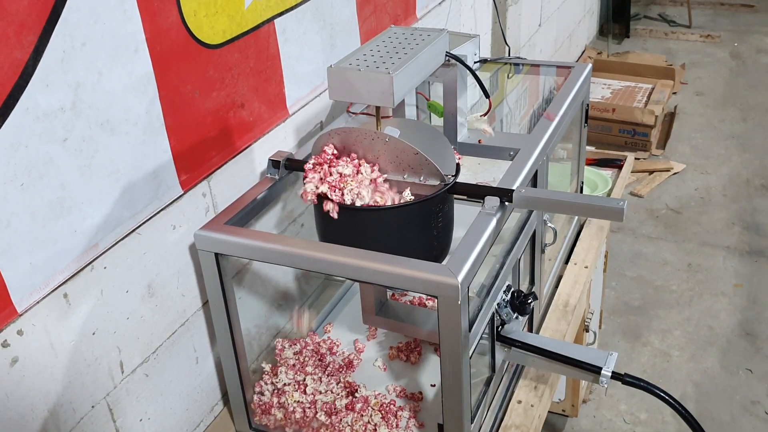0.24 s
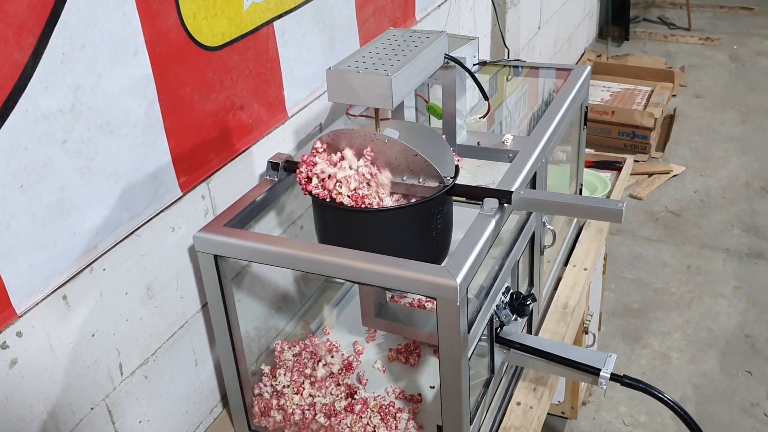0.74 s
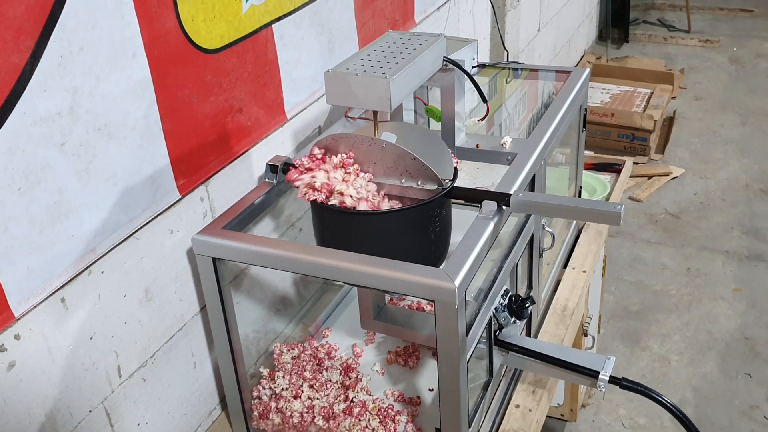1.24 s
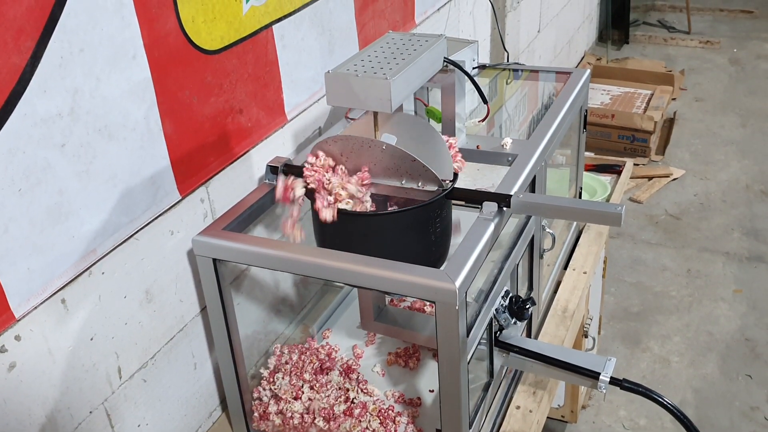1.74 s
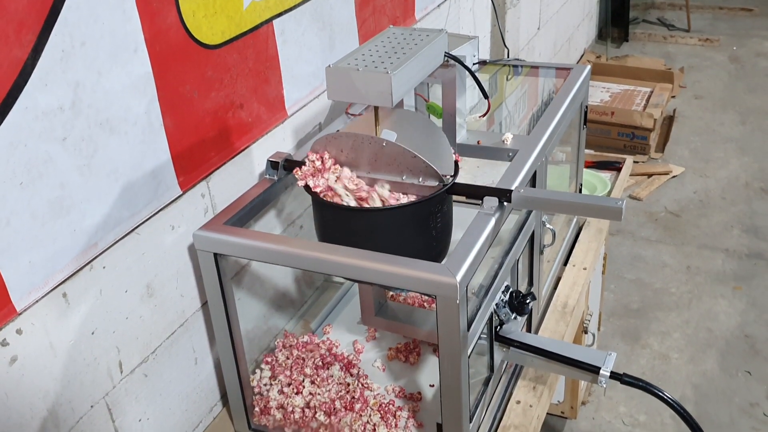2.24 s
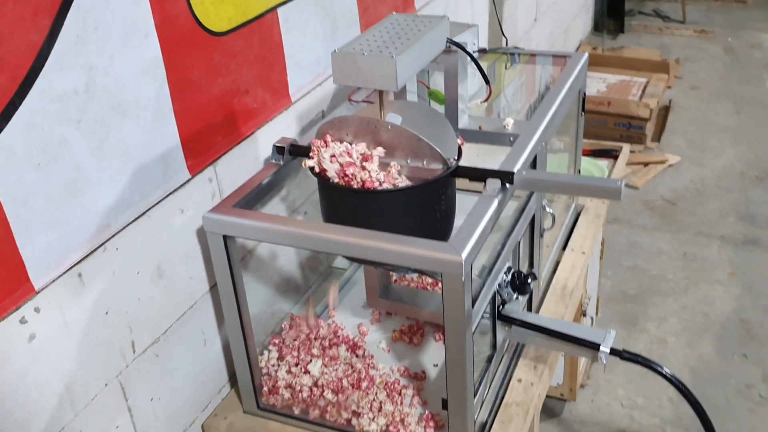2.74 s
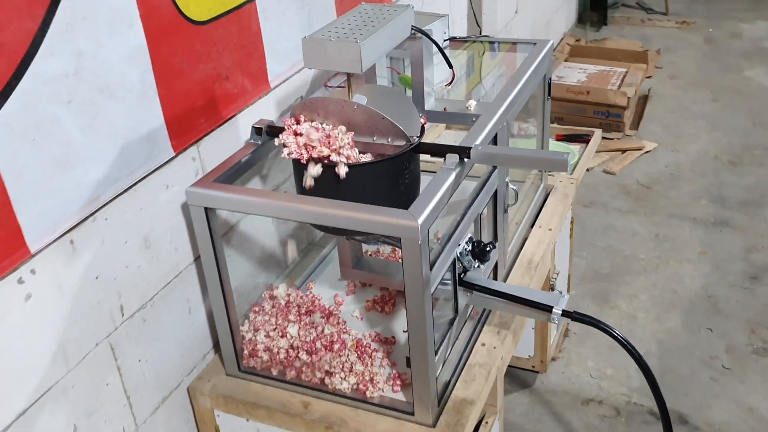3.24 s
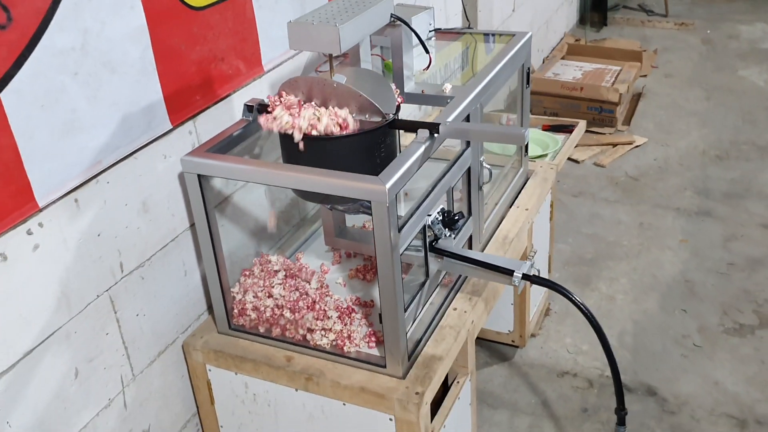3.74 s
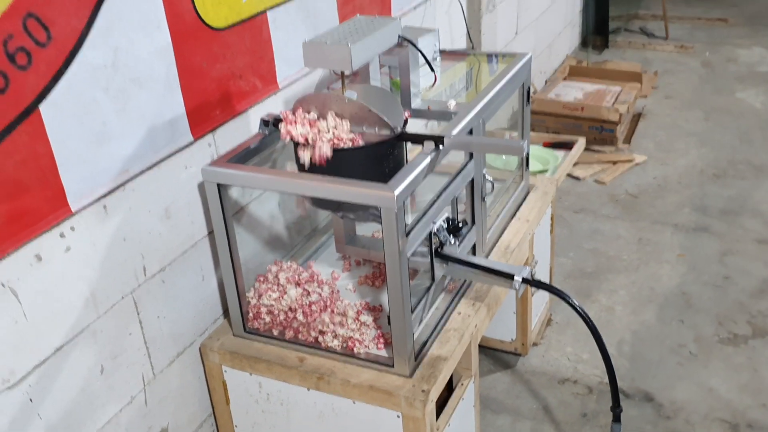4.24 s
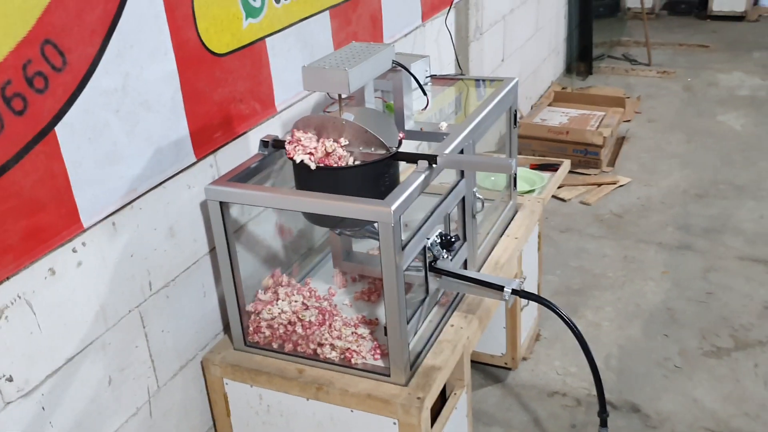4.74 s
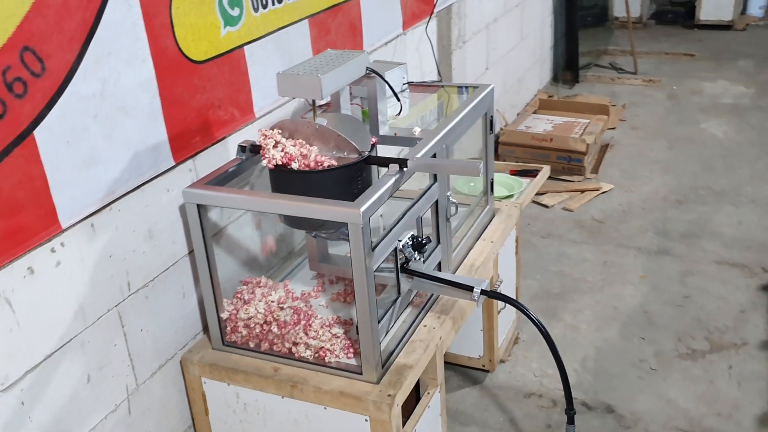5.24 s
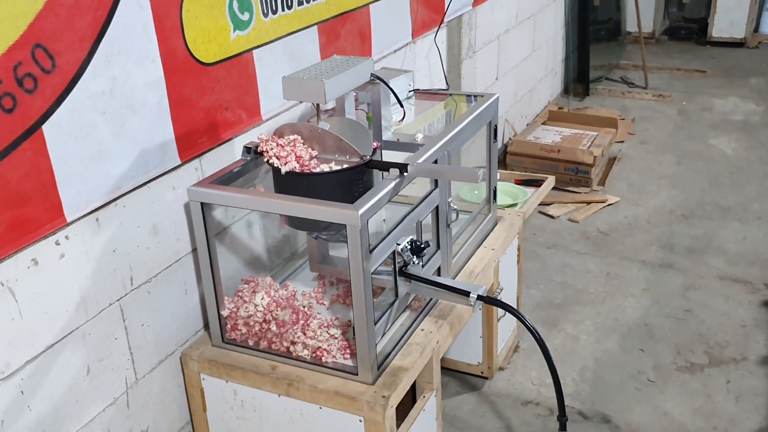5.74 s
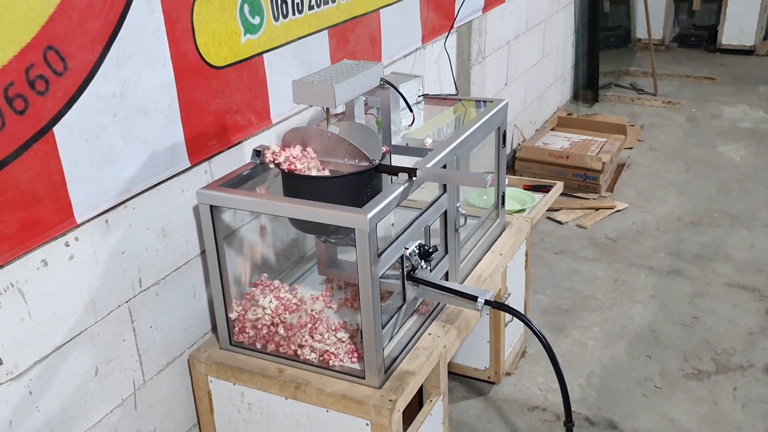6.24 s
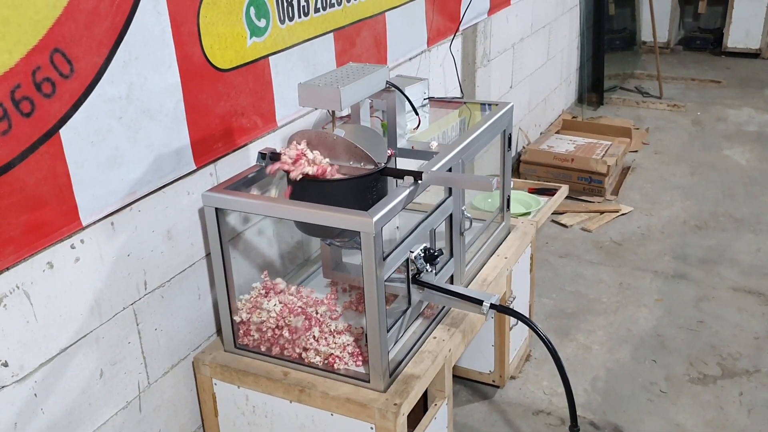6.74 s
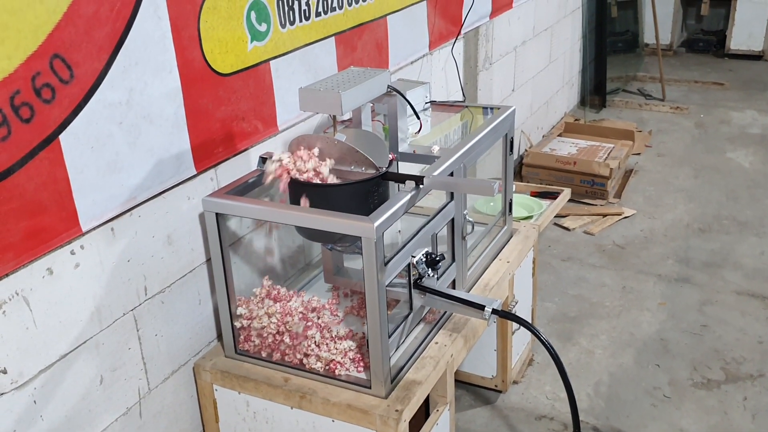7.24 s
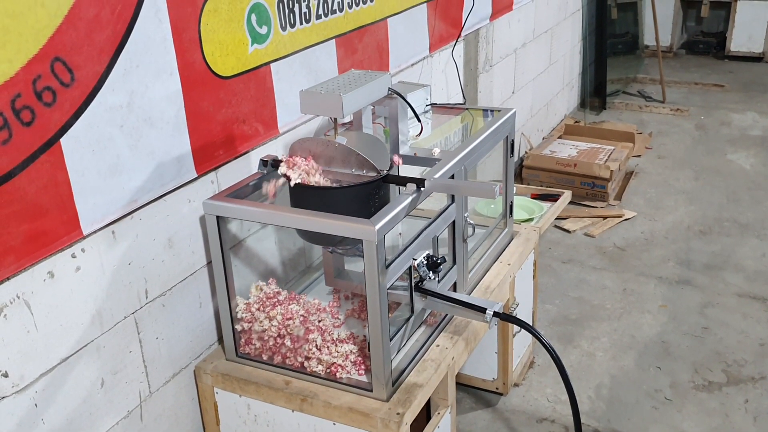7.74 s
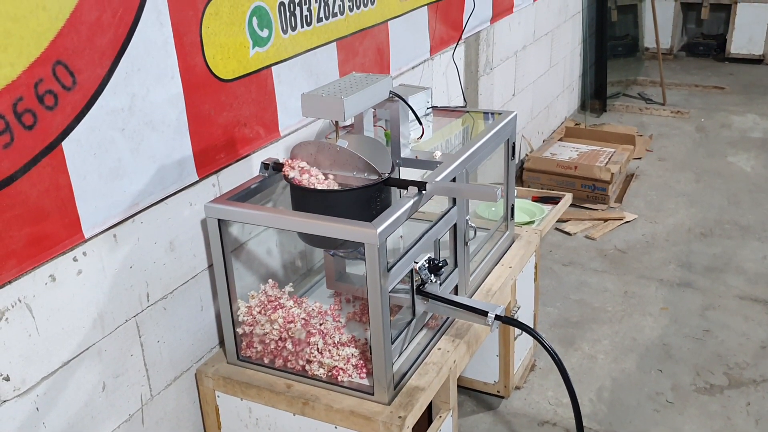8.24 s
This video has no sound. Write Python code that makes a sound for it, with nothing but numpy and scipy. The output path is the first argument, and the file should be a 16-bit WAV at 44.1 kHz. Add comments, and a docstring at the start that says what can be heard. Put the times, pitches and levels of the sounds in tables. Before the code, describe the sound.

Dense uneven popping with hollow pot knocks and crisp steam snaps, a faint stirrer whine and sizzle beneath, echoing briefly in a hard room.

```python
"""Bare hall: kernels burst one after another in a steel kettle half full of popped corn, a couple of metres away.
Each burst knocks the air and wall of the kettle into a short hollow ring (decaying sines), followed by a
softer rebound, and lets out a crack of steam (resonant noise). The stirrer motor hums and whines and the hot
oil hisses (filtered noise); decaying noise echoes give the hall, and a limiter ducks under loud bursts."""
import sys
import numpy as np
from scipy import signal
from scipy.io import wavfile

SR = 44100
rng = np.random.default_rng(int(sys.argv[2]) if len(sys.argv) > 2 else 0)


def persist_wave(psi):
    """Save psi, clipped to +-1, as 16-bit WAV."""
    counts = np.round(np.clip(psi, -1, 1) * 32767).astype(np.int16)
    wavfile.write(sys.argv[1], SR, np.atleast_2d(counts).T)


N = 374405


def from_db(db):
    """Amplitude gain of a level in dB."""
    return 10 ** (np.asarray(db) / 20)


def rms_one(x):
    """Scaled to rms 1."""
    return x / np.sqrt(np.mean(x ** 2) + 1e-20)


def butter2(kind, edges_hz, x):
    """Second-order Butterworth design applied to x."""
    return signal.sosfilt(signal.butter(2, edges_hz, kind, fs=SR, output="sos"), x)


def drift(rate_hz):
    """Slow random wander of rms 1: two-pole low-passed noise, computed at SR / 40 and interpolated."""
    step, settle = 40, 2000
    pole = np.exp(-2 * np.pi * rate_hz * step / SR)
    noise = rng.standard_normal(N // step + settle + 2)
    slow = signal.lfilter([1], [1, -2 * pole, pole * pole], noise)[settle:]
    return np.interp(np.arange(N) / step, np.arange(len(slow)), rms_one(slow))


def resonance(x, hz, width_hz):
    """Two-pole band-pass with gain near 1 on top."""
    r = np.exp(-np.pi * width_hz / SR)
    zeros = np.array([1, 0, -1]) * (1 - r * r) / 2
    poles = [1, -2 * r * np.cos(2 * np.pi * hz / SR), r * r]
    return signal.lfilter(zeros, poles, x)


def clicks_at(start_s, gains):
    """Click train: one sample per start time."""
    out = np.zeros(N)
    np.add.at(out, np.clip((start_s * SR).astype(int), 0, N - 1), gains)
    return out


def fading(clicks, t60_s):
    """Each click starts an exponential fade."""
    decay = from_db(-60 / (t60_s * SR))
    return signal.lfilter([1], [1, -decay], clicks + 1e-18)   # offset avoids denormals


def hiss(level_db, patchy_db):
    """Hiss and rumble of motor, burner and oil: third-octave noise bands, each with its own quick flicker."""
    # noise spectrum, relative: f/Hz, density/dB
    spectrum = [(20, -44), (55, -31), (100, -38), (250, -49), (500, -1.5), (1000, 1.5), (2000, -9.5),
                (2800, -9.5), (3700, -9), (5500, -15.5), (7200, -16.5), (8300, -9), (10000, -45),
                (16000, -60)]
    hz_of, db_of = np.transpose(spectrum)
    edges_hz = 20 * 2 ** np.arange(0, 9.9, 1 / 3)
    white = rng.standard_normal((2, N))   # alternate bands share a source
    out = 0
    for k, (low_hz, high_hz) in enumerate(zip(edges_hz, edges_hz[1:])):
        band = butter2("band", [low_hz, high_hz], white[k % 2])
        db = np.interp(np.log(low_hz * high_hz) / 2, np.log(hz_of), db_of)
        out = out + from_db(db + patchy_db * drift(40)) * band
    return from_db(level_db) * rms_one(out)


def motor():
    """Housing and gears sing as narrow bands of noise, slowly wavering in level."""
    # motor resonances: f/Hz, width of each of two passes/Hz, rms before wavering/dB
    modes = [(66.4, 81, -39.5), (148.4, 11.6, -37.5), (2320, 210, -42.5), (2482, 55, -44.5)]
    out = 0
    for hz, width_hz, rms_db in modes:
        once = resonance(rng.standard_normal(N), hz, width_hz)
        band = rms_one(resonance(once, hz, width_hz))
        out = out + from_db(rms_db + 0.5 * drift(1.4)) * band
    return out


def hall(x, count=9):
    """Dense reflections build up in a few ms and die band by band; they change as the listener moves."""
    # reverberation: band top/Hz, t60/s, level/dB
    bands = [(723, 0.36, -2), (2700, 0.27, 0), (8000, 0.38, -2)]
    build_s = 0.0081
    t = np.arange(SR // 2) / SR
    white = rng.standard_normal((count, len(t)))
    answers, low_hz = 0, 100
    for top_hz, t60_s, db in bands:
        band = butter2("band", [low_hz, top_hz], white)
        tail_norm = np.sqrt(t60_s * SR / (2 * np.log(1000)))   # equalises tail energy across t60
        answers = answers + band * from_db(db - 60 * t / t60_s) / tail_norm
        low_hz = top_hz
    answers = answers * (1 - np.exp(-t / build_s))
    # crossfade through the responses at an even pace
    place = np.linspace(0, count - 1, N)
    near = np.maximum(1 - np.abs(place - np.arange(count)[:, None]), 0)
    return signal.oaconvolve(x * near, answers, axes=1)[:, :N].sum(axis=0)


def cracks(start_s, crack_db):
    """A puff of steam, its slap off the near wall and a grainy rattle of corn, as noise in resonances."""
    # colour of the crack: f/Hz, width of first pass/Hz, level/dB
    colour = [(1930, 834, 5), (3180, 550, 3), (3890, 774, 4), (6015, 910, -10.5), (7017, 660, -3),
              (8700, 454, -6), (12100, 4800, -22.5)]
    wall_echo_s, wall_echo_db = 0.0057, -11
    rattle_db, scatter_db = -10.5, 3.5
    luck = rng.standard_normal((len(start_s), len(colour)))
    # grains: noise whose level jumps every 64 samples
    grain_db = 3.17 * np.repeat(rng.standard_normal(N // 64 + 1), 64)[:N]
    grains = rng.standard_normal(N) * from_db(grain_db)
    out = 0
    for k, (hz, width_hz, db) in enumerate(colour):
        gains = from_db(crack_db + db + scatter_db * luck[:, k])
        direct = clicks_at(start_s, gains)
        clicks = direct + clicks_at(start_s + wall_echo_s, gains * from_db(wall_echo_db))
        puff = fading(clicks, 0.024) - .5 * fading(clicks, 0.007)
        shape = puff + from_db(rattle_db) * fading(clicks, 0.2)
        band = resonance(resonance(shape * grains, hz, width_hz), hz, 2 * width_hz)
        out = out + band * (-1) ** k
    return out


def hollow_pitch(start_s):
    """Favoured pitch of each hollow ring in Hz, lower once the listener has stepped back."""
    # centre pitch: t/s, f/Hz
    course = [(0, 490), (0.5, 530), (3.0, 543), (4.0, 474), (5.3, 454), (8.49, 497)]
    spread = 0.055   # relative, per burst
    stray = 1 + spread * rng.standard_normal(len(start_s))
    return np.interp(start_s, *np.transpose(course)) * stray


def kettle(start_s, hollow_db, upper_db, centre_hz, scatter_db, detune):
    """Each burst sits elsewhere in the shifting corn: it drives, detunes and damps every mode anew."""
    # kettle modes: f/Hz, relative level/dB, nominal t60/s
    modes = [(231, 1.5, 0.078), (258, -1, 0.033), (276, -1, 0.088), (379, -4, 0.028), (430.6, -0.5, 0.083),
             (476.7, -3, 0.065), (519.4, -1.5, 0.043), (568.7, -1, 0.085), (619, -3.5, 0.081),
             (697.3, -4.5, 0.13), (894, 11.5, 0.051), (1040, 12.5, 0.03), (1111, 20.5, 0.022),
             (1193, 15.5, 0.036), (1224, -14, 0.12), (1428, 1, 0.13), (1460, -0.5, 0.048), (1674, 5, 0.049),
             (1776, -1, 0.052), (2140, -9, 0.034)]
    hz, level_db, t60_s = np.transpose(modes)
    upper_from_hz, deep_to_hz = 760, 340
    deep_loss_db_per_s = 0.7
    rebound_min_s, rebound_max_s, rebound_db = 0.004044, .011, -9.5
    upper, deep = hz > upper_from_hz, hz < deep_to_hz
    build_s = np.where(upper | deep, 0.61 / hz, .003)   # kettle air takes a few ms to swing up
    luck = rng.standard_normal((len(start_s), 4, len(modes)))
    t = np.arange(SR // 8)[:, None] / SR
    knock = 1 + upper * 1.4 * np.exp(-t / .0028)   # hard head of the wall's answer
    rebound = (SR * rng.uniform(rebound_min_s, rebound_max_s, len(start_s))).astype(int)
    out = np.zeros(N + 2 * len(t))
    for k, (drive, shift, damp, late) in enumerate(luck):
        # hollow modes near the centre are favoured
        away_octaves = np.clip(np.abs(np.log2(hz / centre_hz[k])), 0, .45)
        db = level_db + scatter_db * drive - np.where(upper, 0, 22 * away_octaves)
        # deepest modes thin out within the hollow ring as the listener steps back
        db = db - deep_loss_db_per_s * start_s[k] * deep
        since_s = np.maximum(t - 0.33 * np.abs(late) / hz, 0)
        burst_t60_s = t60_s * from_db(0.66 * damp)
        fade = (1 - np.exp(-since_s / build_s)) * from_db(db - 60 * since_s / burst_t60_s)
        swing = np.sin(2 * np.pi * hz * (1 + detune * shift) * since_s)
        rings = -knock * fade * swing
        at = int(start_s[k] * SR)
        again = at + rebound[k]   # the kernel strikes the wall again
        for group, peak_db in ((~upper, hollow_db[k]), (upper, upper_db[k])):
            ring = rings[:, group].sum(axis=1)
            ring = from_db(peak_db) * ring / np.abs(ring).max()
            out[at:at + len(t)] += ring
            out[again:again + len(t)] -= from_db(rebound_db) * ring
    # a small body radiates no steady push
    return butter2("high", 140, out[:N])


def popping():
    """The clear bursts, and many faint ones smothered deep in the heap at random times."""
    # bursts: t/s, hollow ring peak before filtering/dB, upper ring peak before filtering/dB, crack level/dB
    pops = [(0.004, -10, -7.5, -18.0), (0.032, -1, -5, -17.5), (0.063, -11, -13, -21),
            (0.147, -10.5, -6.5, -21), (0.167, -9.5, -25, -13), (0.267, -5, -12.5, -25.0),
            (0.286, -30, -16, -15.5), (0.313, -12.5, -1.5, -25), (0.337, -9.5, -3.5, -26),
            (0.367, -12, -15, -20.5), (0.39, -12.5, -15, -34), (0.44, -6, 1, -10), (0.469, -4, -0.5, -26),
            (0.509, -3, -2, -13), (0.52, -17, -10, -21), (0.531, -5.5, 0, -19), (0.595, -9.5, -4.5, -16),
            (0.616, -6.5, -4, -26), (0.632, 1.5, 2.5, -14), (0.683, -15, -10.5, -21.5),
            (0.726, -6.5, -9.5, -18), (0.808, -6.5, -3.5, -23.5), (0.835, -7.5, -7.5, -22),
            (0.921, -7.5, -9, -25.5), (0.931, -11, -11, -21), (0.97, -8.0, -5, -19.5),
            (1.001, -6, -9.0, -20), (1.024, -3.0, -8.5, -13.5), (1.119, -5, -8, -14.5),
            (1.135, -32, -13, -29), (1.164, -8.0, -3.5, -32), (1.196, -7.0, -7.0, -15.5),
            (1.229, -8.5, -14, -32), (1.239, -15, -7, -17), (1.281, -7.5, -10, -27), (1.32, -5.5, -10, -31),
            (1.328, -9, -16, -15), (1.457, -14, -11.5, -19.5), (1.508, -16.5, -10.5, -19.5),
            (1.529, -11, -7.0, -26), (1.614, -13.0, -16.5, -24.5), (1.733, -14, -7, -19),
            (1.763, -8.5, -14, -19.5), (1.817, -8.5, -9, -23), (1.841, -14.0, -8, -28),
            (1.941, -9, -9, -19), (2.07, -8, -5.5, -23), (2.154, -6, -7.5, -21), (2.178, -10, -21, -29.0),
            (2.207, -8, -11, -17.5), (2.222, -0.5, -4.5, -17.5), (2.256, -15, -10, -16.5),
            (2.268, -9, -5, -25), (2.34, -5, -8.5, -21.5), (2.423, -10.5, -13.0, -30),
            (2.465, -4.5, -6.5, -14), (2.575, -17, -20, -30), (2.598, -7.5, -6, -20),
            (2.61, -2.5, -9, -17.5), (2.752, -2, -1.5, -10), (2.871, -10.5, -8, -21.5),
            (2.901, -14.5, -32, -22.5), (2.96, -13.5, -19.0, -22), (2.974, -12, -14, -13.5),
            (2.986, -9, -29, -30), (3.013, -9.5, -5, -25), (3.099, -8.5, -2, -14), (3.15, -8, -8, -18.5),
            (3.194, -7.5, -2.5, -15), (3.235, -8.5, -3, -12), (3.262, -4, -3.5, -25),
            (3.285, -6.5, -1, -15.5), (3.372, -6.0, -4.0, -24), (3.531, -9.0, -15, -23.5),
            (3.545, -9, -9.5, -28), (3.617, -4.5, -4, -17.5), (3.653, -5.5, -6.5, -14.0),
            (3.859, -8.5, -11.5, -15.5), (3.893, -4.0, -2, -21.5), (4.074, -9, -8.5, -23.5),
            (4.115, -10, -13.5, -27), (4.219, -5, 1, -24), (4.257, -14, -22, -22), (4.304, -4.0, -3.5, -11),
            (4.326, -6.0, -2, -17), (4.35, -11, -2, -21), (4.369, -26, -12.0, -37.0),
            (4.393, -9.5, -8.5, -24), (4.444, -10, -7.5, -17), (4.478, -12.0, -15, -24),
            (4.5, -9, -11, -14), (4.517, -4.5, -7, -21), (4.531, -21, -9.5, -34), (4.568, -12, -5.5, -15),
            (4.584, -6, -27.0, -14.0), (4.591, -14, -9, -24), (4.618, -9.5, -3.5, -20),
            (4.682, -14.5, -9.5, -21.5), (4.839, -15.0, -18.0, -24.5), (4.864, -5.5, -8.5, -16.5),
            (4.912, -7.5, -5.5, -22), (5.023, -13.0, -14, -18.5), (5.046, -4, -5.5, -16),
            (5.085, -6.5, -13.5, -16), (5.158, -9.5, -12.5, -23), (5.189, -9.5, -16, -28.0),
            (5.211, -20, -10, -12), (5.26, -16.0, -12, -29), (5.328, -8.5, -10, -19.5),
            (5.366, -8.5, -9, -23), (5.405, -11, -14, -24.5), (5.433, -7.5, -13.0, -17.5),
            (5.47, -10.5, -18, -25.5), (5.506, -28, -12, -31), (5.531, -10, -6, -25),
            (5.739, -13.5, -13, -16.5), (5.784, -17, -16, -22), (5.812, -14, -12, -26),
            (5.823, -9.5, -10, -31), (5.898, -17.5, -1, -16.0), (5.916, -22, -12, -36),
            (5.966, -9.5, -5.5, -23), (5.999, -7.5, -12, -16), (6.066, -13, -17, -20.5),
            (6.087, -10.5, -13, -28), (6.096, -6.0, -2, -23), (6.135, -10, -10, -19),
            (6.168, -4.5, -4.5, -15.5), (6.208, -18, -14, -38), (6.243, -9.5, -13.0, -28),
            (6.318, -14, -6.5, -17.0), (6.421, -16, -11.5, -30.0), (6.526, -10.5, -16, -12),
            (6.555, -5.0, -12.0, -28), (6.573, -8.5, -10, -33), (6.594, -17, -17, -27.0),
            (6.639, -10, -17, -22), (6.69, -13.5, -12.5, -19.5), (6.824, -10.0, -19, -21.5),
            (6.846, -5, -7.0, -20.5), (6.872, -5, -9, -17.5), (6.925, -10.0, -10.5, -23),
            (7.002, -13.5, -9.5, -25.5), (7.064, -15.5, -26, -30), (7.14, -11.0, -11.5, -21.5),
            (7.184, -20, -28, -14.5), (7.194, -16.5, -8.5, -31), (7.241, -5.5, -5.5, -14),
            (7.272, -26.0, -7, -36), (7.358, -13.0, -19, -22.0), (7.381, -6.5, -2.5, -19),
            (7.512, -16, -21, -29), (7.645, -7, -5.5, -11.5), (7.723, -21.0, -27, -32),
            (7.806, -10, -19.0, -17.5), (7.823, -2.5, -4.5, -14), (7.887, -14.5, -13.0, -23.5),
            (7.965, -21, -20, -27), (8.014, -8.5, -6.5, -20.5), (8.08, -5.0, -12, -14.5),
            (8.155, -7.5, -17.5, -23.0), (8.255, -5, -10.0, -13.5), (8.29, -10.5, -6, -16.5),
            (8.305, -8.5, -6.5, -20), (8.399, -5, -4.5, -17.5), (8.476, -7.5, -13.5, -18.5)]
    start_s, hollow_db, upper_db, crack_db = np.transpose(pops)
    clear = kettle(start_s, hollow_db, upper_db, hollow_pitch(start_s), scatter_db=1.0, detune=0.033)
    clear = clear + cracks(start_s, crack_db)

    faint_count, softest_db, range_db = 150, -36.5, 16
    draws = rng.random((faint_count, 2))
    start_s = draws[:, 0] * N / SR
    db = softest_db + range_db * draws[:, 1] ** 2   # mostly near the softest
    faint = kettle(start_s, db, db - 4, hollow_pitch(start_s), scatter_db=14.0, detune=0.04)
    return clear + faint + cracks(start_s, db - 8.5)


def scene():
    """Popping and the hall's answer over the steady machine."""
    pops = popping()
    machine = hiss(level_db=-35.5, patchy_db=3.5) + motor()
    return (pops + hall(pops) + machine)[None]


def record(dry):
    """Small microphone: no deep bass, a dip from its port, a limiter ducking loud bursts, soft clipping."""
    threshold_db, release_db_per_s, attack_s = -3, 40, 0.013
    duck_share = .5   # dB of ducking per dB over threshold
    cutoff_hz, noise_db = 15700, -60
    heard = signal.sosfilt(signal.butter(3, 50, "high", fs=SR, output="sos"), dry)
    heard = heard - 0.81 * resonance(heard, 8530, 920)

    over_db = np.maximum(20 * np.log10(np.abs(heard) + 1e-9) - threshold_db, 0)
    release_db = release_db_per_s * np.arange(N) / SR
    held_db = np.maximum.accumulate(over_db + release_db, axis=1) - release_db   # peak hold, linear release
    pole = np.exp(-1 / (attack_s * SR))
    smooth_db = signal.lfilter([1 - pole], [1, -pole], held_db)
    ducked = heard * from_db(-duck_share * smooth_db)

    ducked = ducked + from_db(noise_db) * rng.standard_normal(N)   # even hiss of the electronics
    rounded = ducked / (1 + ducked ** 4) ** (1 / 4)
    return signal.sosfilt(signal.ellip(10, .3, 80, cutoff_hz, fs=SR, output="sos"), rounded)


dry = scene()
out = record(dry)
persist_wave(out)
```